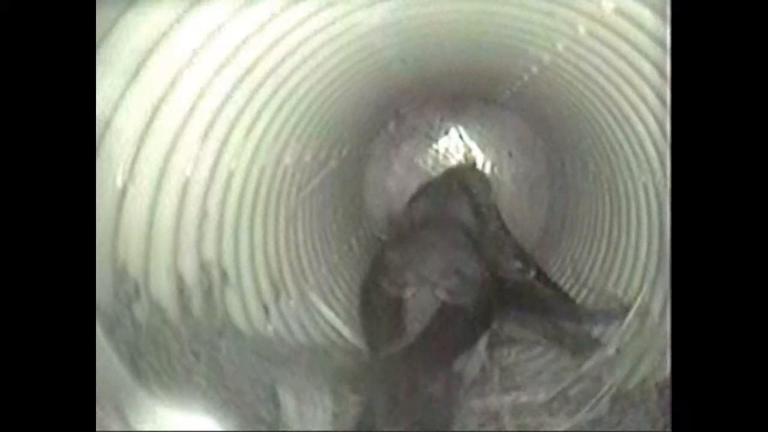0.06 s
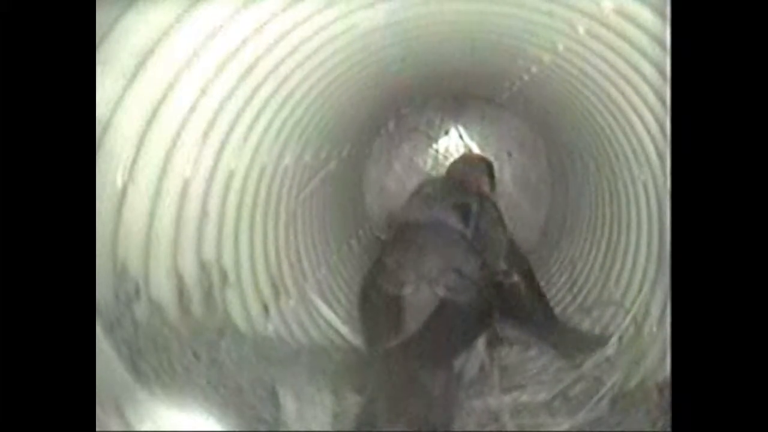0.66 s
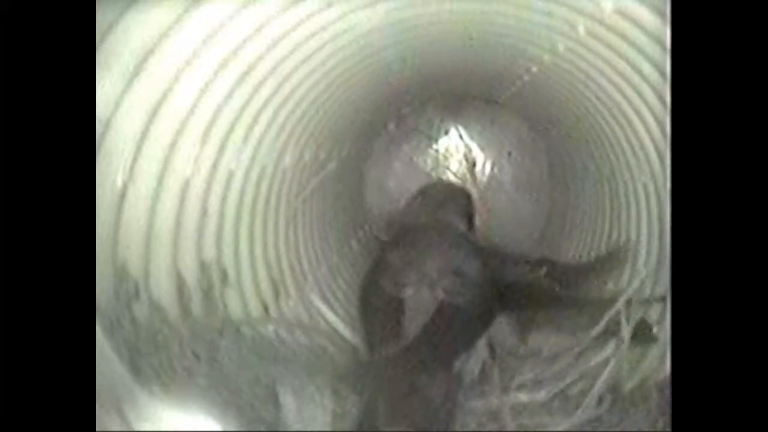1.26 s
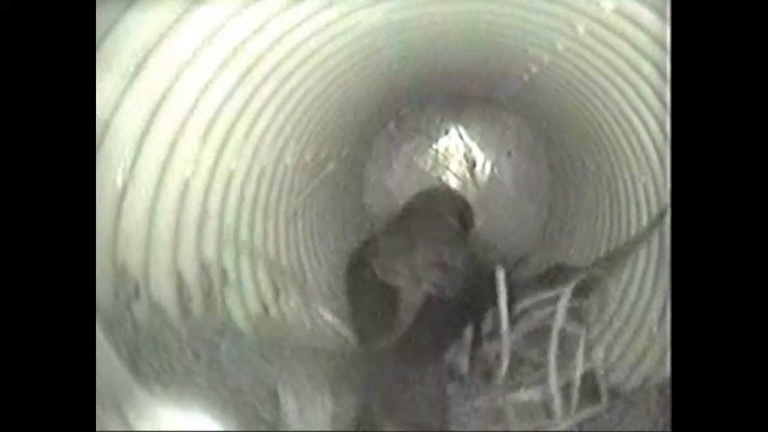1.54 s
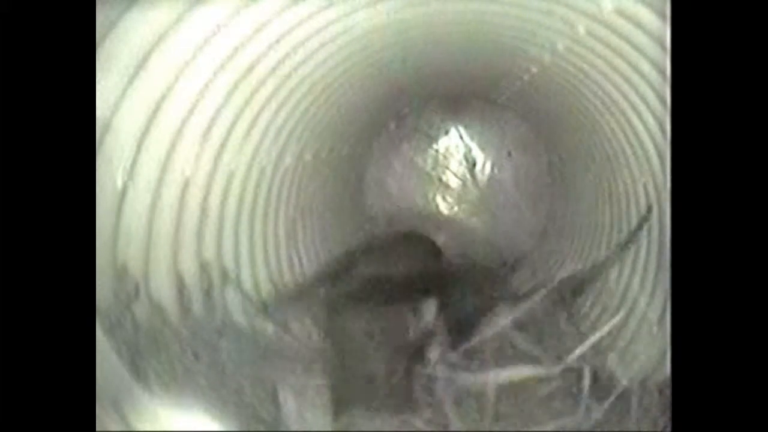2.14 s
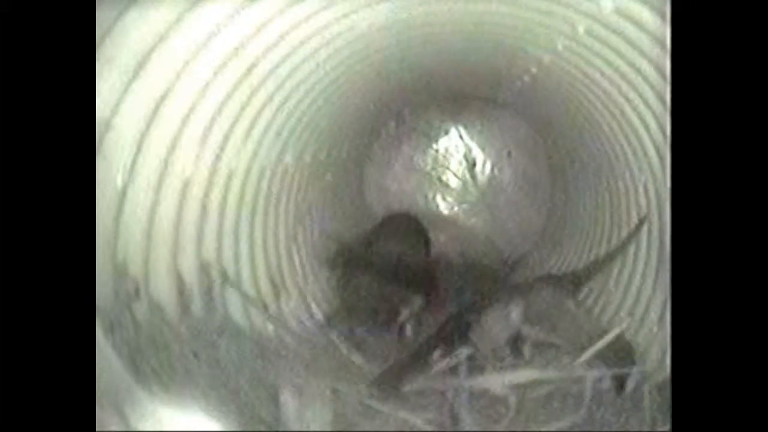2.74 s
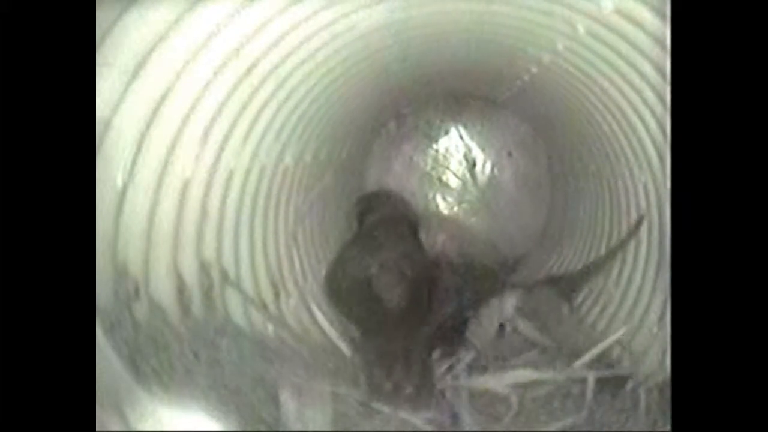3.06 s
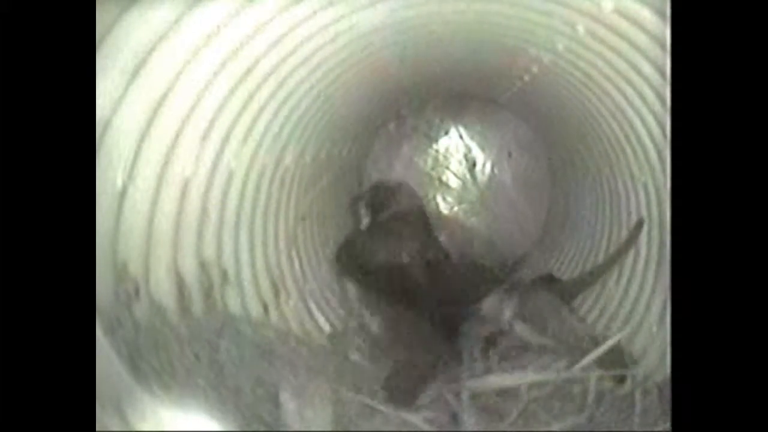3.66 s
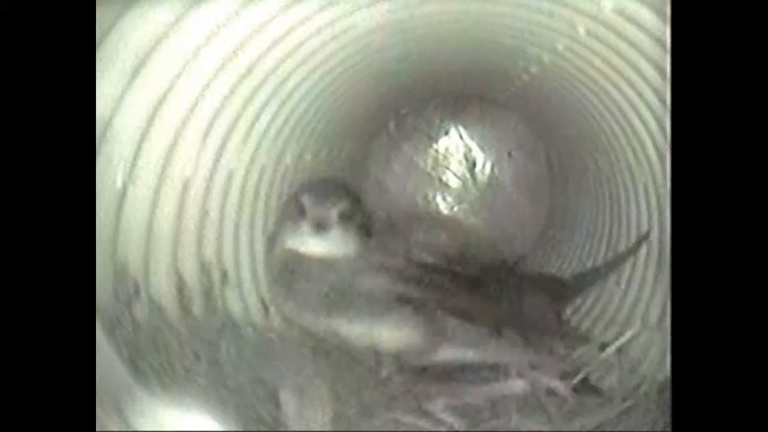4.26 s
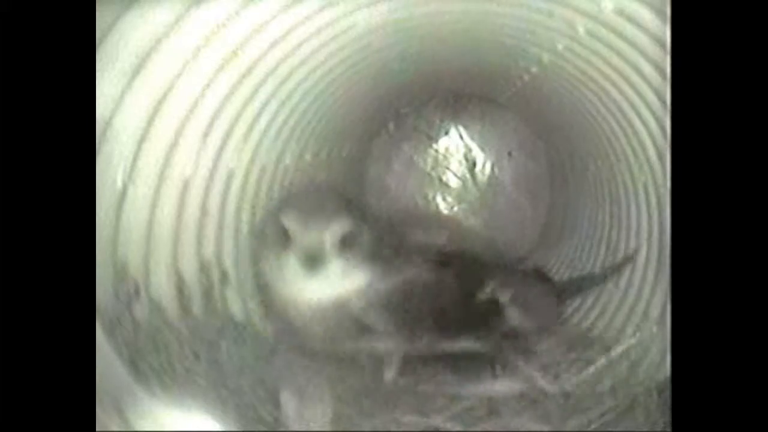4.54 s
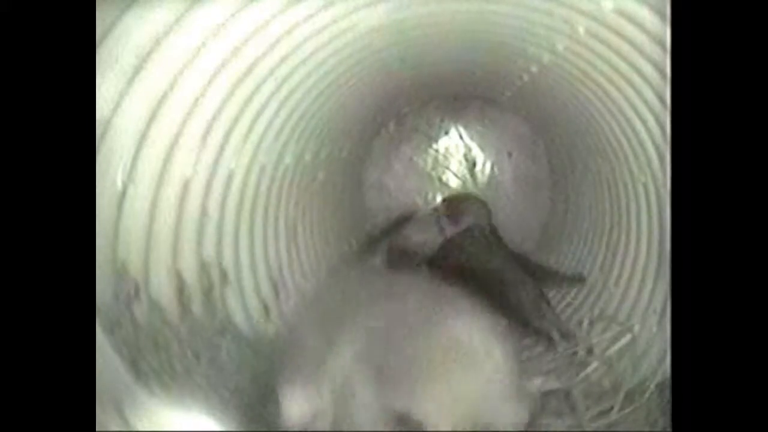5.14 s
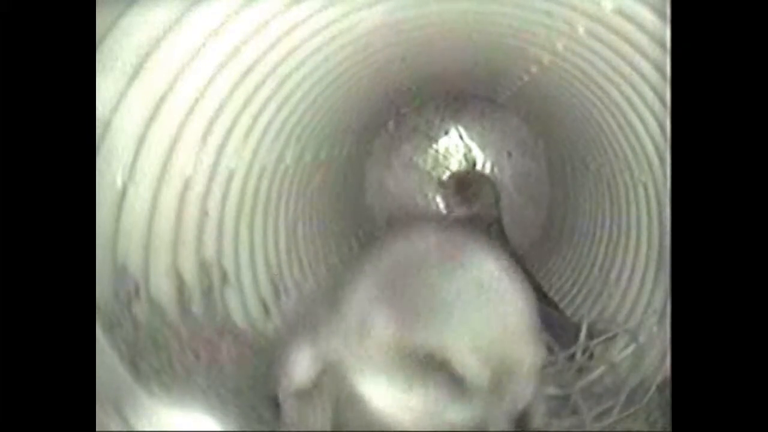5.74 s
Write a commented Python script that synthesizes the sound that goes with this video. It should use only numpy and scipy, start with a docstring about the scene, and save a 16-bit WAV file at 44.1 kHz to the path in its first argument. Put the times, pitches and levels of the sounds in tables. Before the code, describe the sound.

Heard through a small microphone inside a narrow nesting pipe, a faint steady hum, thin whine and hiss lie under brief, hoarse calls from small birds. The raspy squawks come mostly in pairs with pauses between, growing louder. Through the middle the birds shuffle, their claws lightly scratching and ticking on straw. Two dull microphone pops land on the strongest rasp, then the rustling fades around a last pair of calls.

```python
"""Inside a ribbed nest pipe, small birds shuffle on straw and give short, scratchy rasps, mostly in pairs.
Each rasp is a quick train of arched pips and two-voiced burrs from the syrinx; most swell, and all
end in a falling squawk. Claws tick on the straw, and the loudest pips overload the microphone
into two dull pops. The nest camera adds a 50 Hz electrical buzz, a thin whine and hiss."""
import sys
import numpy as np
from scipy import signal
from scipy.fft import rfft, irfft, next_fast_len
from scipy.io import wavfile
from scipy.ndimage import map_coordinates

SR = 44100
rng = np.random.default_rng(int(sys.argv[2]) if len(sys.argv) > 2 else 0)


def pcm_store(signal):
    """Save signal as 16-bit PCM."""
    levels = np.round(np.clip(np.atleast_2d(signal), -1, 1) * 32767)
    wavfile.write(sys.argv[1], SR, levels.astype(np.int16).T)


N = 255765


def amp(db):
    return 10 ** (np.asarray(db) / 20)


def unit_rms(x):
    return x / np.sqrt(np.mean(x ** 2) + 1e-20)


def gain_at(spectrum, hz):
    """Linear gain from (frequency [Hz], gain [dB]) points on a log axis."""
    knots_hz, knots_db = np.transpose(spectrum)
    return amp(np.interp(np.log(hz + 1), np.log(knots_hz + 1), knots_db))


def filtered(x, response):
    """Zero-phase filter with gain response(hz)."""
    size = next_fast_len(len(x) + SR // 10)
    return irfft(rfft(x, size) * response(np.fft.rfftfreq(size, 1 / SR)), size)[:len(x)]


def coloured(x, spectrum):
    return filtered(x, lambda hz: gain_at(spectrum, hz))


def wobble(t, knots_per_s):
    """Smooth random curve."""
    return map_coordinates(rng.standard_normal(1024), [(t - t[0]) * knots_per_s], mode="wrap")


def bell(x, width):
    return np.exp(-.5 * (x / width) ** 2)


# Buzz partials: (frequency before rounding to a harmonic [Hz], relative level [dB])
BUZZ_PARTIALS = [(150.7, -82), (199.2, -76.5), (247.6, -73.5), (301.5, -71), (349.9, -72), (398.4, -70),
                 (452.2, -73.5), (500.6, -74), (899.0, -79.5), (947.5, -79), (1001, -72.5), (1050, -84.5),
                 (1098, -81.5)]


def camera_buzz(buzz_hz=50, whine_hz=1000, tick_s=.0012):
    """Harmonics line up in one soft tick a cycle; the whine has a free phase."""
    t = np.arange(N) / SR
    buzz = np.zeros(N)
    for hz, db in BUZZ_PARTIALS:
        hz = buzz_hz * np.round(hz / buzz_hz)
        phase = rng.uniform(0, 2 * np.pi) if hz == whine_hz else rng.normal(0, .16)
        buzz += np.sqrt(2) * amp(db) * np.cos(2 * np.pi * hz * (t - tick_s) + phase)
    return amp(2) * buzz


# Hiss spectrum: (frequency [Hz], gain [dB])
HISS_SPECTRUM = [(25, -10), (60, -20), (110, -18.5), (180, -8.5), (310, -2), (420, 0), (600, -4), (800, -6),
                 (1050, -7.5), (1500, -13.5), (4000, -23.5), (9000, -31.5), (11200, -38.5), (12300, -73)]


def camera_hiss(rms_db=-59.5):
    """Steady noise floor of the nest camera."""
    return amp(rms_db) * unit_rms(coloured(rng.standard_normal(N), HISS_SPECTRUM))


# Rustle envelope: (time [s], relative level [dB])
RUSTLE_LEVELS = [(0, -87), (1.6, -80), (1.85, -64.5), (2.2, -78), (5.0, -77), (5.8, -89)]
# Claw catches: (time [s], relative level [dB])
CLAW_CATCHES = [(2.2935, -47), (2.6366, -45.5), (2.7044, -46.5), (2.8206, -49), (2.849, -41.5),
                (2.914, -51.5), (3.0123, -47.5), (3.147, -46.5), (3.273, -55), (3.512, -53), (3.536, -43.5),
                (3.658, -54), (4.173, -53), (4.2707, -50.5), (4.459, -54)]
# Straw spectrum: (frequency [Hz], gain [dB])
STRAW_SPECTRUM = [(800, -47), (1800, 4.5), (3200, 6.5), (4700, 8), (5600, -13.5), (9500, -17.5),
                  (11900, -7), (13000, -48)]


def straw(catch_s=.0017, brush_s=.013, brush_db=-16):
    """Stalks crackle under the birds; a claw's catch adds a tick and a softer, longer brush."""
    t = np.arange(N) / SR
    rustle_db = np.interp(t, *np.transpose(RUSTLE_LEVELS))
    force = amp(rustle_db + 1.02 * wobble(t, 25.4))
    for time_s, db in CLAW_CATCHES + light_steps():
        near = abs(t - time_s) < .08
        since_s = t[near] - time_s - .003
        force[near] += amp(db - 11) * (bell(since_s, catch_s) + amp(brush_db) * bell(since_s, brush_s))
    grains = rng.standard_normal(N) * amp(3.5 * wobble(t, 350))
    return amp(4.5) * coloured(force * unit_rms(grains), STRAW_SPECTRUM)


def light_steps(from_s=2.0, to_s=4.75, steps_per_s=10, count=40):
    """Uneven scratches as the birds turn round: (time [s], relative level [dB])."""
    lag, strength = rng.standard_normal((count, 2)).T
    time_s = from_s + (np.arange(count) + .5 * lag) / steps_per_s
    level_db = -53.5 + 6 * strength
    return list(np.column_stack([time_s, level_db])[time_s < to_s])


PIP_PERIOD_S = .021


def syrinx_voice(t, pitch_hz, glide, rough):
    """One side of the syrinx: a whistle with weak overtones, its glides repeating every cycle."""
    gesture = wobble(t % PIP_PERIOD_S, 560)
    hz = pitch_hz * (1 + glide * gesture + rough * wobble(t, 2000))
    phase = 2 * np.pi * np.cumsum(hz) / SR
    wave = np.sin(phase) + amp(-25) * np.sin(2 * phase) + amp(-23) * np.sin(3 * phase)
    return unit_rms(wave * amp(1.5 * wobble(t, 900)))


def pips(t, from_pip_s, low_hz, taut_hz=2656):
    """Pitch arches, loudest at the top; pitch and level follow the tension of the low voice."""
    slack_octaves = max(np.log2(taut_hz / low_hz), 0)
    top_hz = 3780 + .9 * (low_hz - taut_hz)
    arch = 1 - .63 * (1 - bell(from_pip_s, .0024))
    crest = bell(from_pip_s, .0008) + .33 * bell(from_pip_s, .0024)
    return amp(3 - 46 * slack_octaves) * crest * syrinx_voice(t, top_hz * arch, glide=.044, rough=.059)


# Hoarse air spectrum: (frequency [Hz], gain [dB])
THROAT_SPECTRUM = [(700, -15), (1400, -14), (2000, -6), (3300, -4), (5200, -5), (6500, -12), (9500, -13),
                   (11500, -11), (14000, -13)]


def burr(t, left_s, slack, low_hz, high_hz, rest_hz=1930, air_width_hz=380):
    """Both sides of the syrinx sound amid turbulent air and sag as the pressure gives out."""
    tension = (1 - .55 * slack) * (1 - .868 * bell(left_s, .0072))
    sag = 1 - .117 * bell(left_s, .00663)
    low = syrinx_voice(t, rest_hz + (low_hz - rest_hz) * tension, glide=.11, rough=.0483)
    high = syrinx_voice(t, high_hz * sag * (1 - .18 * slack), glide=.13, rough=.0463)
    bands = lambda hz: bell(hz - low_hz, air_width_hz) + bell(hz - high_hz, air_width_hz)
    air = filtered(rng.standard_normal(len(t)), lambda hz: bands(hz) + gain_at(THROAT_SPECTRUM, hz))
    return amp(-5) * low + amp(-3.5) * high + amp(-5.5) * unit_rms(air)


def rasp(t, first_pip_s, length_s, end_db, swell_db, low_hz, high_hz):
    """Pips alternate with burrs; the gaps fill in and the pulses fuse into a squawk."""
    left_s = length_s - t
    cycle = (t - first_pip_s) / PIP_PERIOD_S
    from_pip_s = (cycle - np.round(cycle)) * PIP_PERIOD_S
    from_burr_s = (cycle % 1 - .5) * PIP_PERIOD_S
    pip_train = pips(t, from_pip_s, low_hz) * (left_s > .011)

    squawk = np.clip((.022 - left_s) / .00775, 0, 1)
    slack = 1 - np.maximum(bell(from_burr_s, .0036), squawk)
    gap_fill = .33 * np.clip((t - .006) / .03, 0, 1)
    pulses = .72 * bell(from_burr_s + .0008, .0022) + .45 * bell(from_pip_s + .004, .001)
    throb = .6 + .5 * bell(left_s % .009 - .005, .0018)
    burr_envelope = np.maximum(gap_fill + (1 - gap_fill) * pulses, squawk * throb)
    burr_train = burr_envelope * burr(t, left_s, slack, low_hz, high_hz)

    effort_db = end_db - swell_db * np.clip((left_s - .015) / (length_s - .015), 0, 1)
    soft_opening_db = -3 * (t < first_pip_s + .003) * (first_pip_s < PIP_PERIOD_S / 3)
    gate = np.clip(t / .0012, 0, 1) * np.clip(left_s / .0055, 0, 1)
    return gate * amp(effort_db + soft_opening_db) * (burr_train + pip_train)


# Rasps: (start [s], first pip delay [s], length [s], relative end level [dB], swell [dB],
# low voice [Hz], high voice [Hz])
RASP_CALLS = [ (0.237, .0125, .044, -46, -0.5, 2350, 4630), (0.334, 0.0028, 0.078, -38, 3, 2810, 4750),
              (0.857, .012, 0.028, -56, -6, 1900, 3770), (1.625, 0.014, 0.085, -36, 11, 2950, 4840),
              (1.749, 0.0021, .087, -35.5, 4, 2823, 4410), (1.903, 0.0033, .087, -33.5, 8, 3193, 4700),
              (2.342, .018, 0.087, -38, 3.5, 2610, 4480), (2.490, 0.0048, .088, -36, 3, 2704, 4540),
              (3.798, 0.00154, .098, -31, 10, 2990, 4574), (3.9541, .004, 0.094, -28.5, 3, 2970, 4690),
              (4.942, 0.00097, 0.1, -31.5, 9.5, 2301, 5260), (5.14, .0105, 0.079, -37.5, -2.5, 2367, 4680)]
# Pipe and microphone response: (frequency [Hz], gain [dB])
PIPE_RESPONSE = [(100, 5.5), (600, 10), (1600, 2), (1950, 6), (2450, -4.8), (3050, 3.6), (3800, -4),
                 (4600, 3), (5300, -0.5), (6500, -1), (9800, -2.5), (11500, 6), (13000, -5), (14200, -20)]


def birds(rt60_s=.018, echo_db=-12):
    """Rasps with quick reflections from the pipe wall; harder ones are brighter."""
    out, t = np.zeros(N + SR), np.arange(SR // 7) / SR
    for start_s, first_pip_s, length_s, end_db, swell_db, low_hz, high_hz in RASP_CALLS:
        call = rasp(t, first_pip_s, length_s, end_db, swell_db, low_hz, high_hz)
        treble_db = .25 * (end_db + 41.5)
        call = filtered(call, lambda hz: amp(treble_db * np.clip((hz - 5000) / 1500, 0, 1)))
        wall = rng.standard_normal(len(t)) * amp(-60 * t / rt60_s) * (t > .0004)
        echo = signal.fftconvolve(call, wall / np.linalg.norm(wall))[:len(t)]
        out[round(start_s * SR):][:len(t)] += call + amp(echo_db) * echo
    return coloured(out[:N], PIPE_RESPONSE)


# Microphone overloads: (time [s], relative level [dB])
OVERLOADS = [(4.022, -20.5), (4.031, -26.5)]
# Pop spectrum: (frequency [Hz], gain [dB])
POP_SPECTRUM = [(60, -44), (150, -8), (230, 5), (550, -2), (900, -10.5), (1600, -4), (4000, -60)]


def overload_pops(t60_s=.0081):
    """The overloaded microphone recovers with a short, dull pop."""
    out, t = np.zeros(N), np.arange(SR // 30) / SR
    sinking_hz = 270 + 500 * np.exp(-t / .0016)
    tone = np.sin(2 * np.pi * np.cumsum(sinking_hz) / SR)
    for time_s, db in OVERLOADS:
        out[round(time_s * SR):][:len(t)] += amp(db - 60 * t / t60_s) * tone
    return coloured(out, POP_SPECTRUM)


def scene():
    """One microphone in the pipe feeds both channels."""
    mono = birds() + overload_pops() + straw() + camera_buzz() + camera_hiss()
    return np.array([mono, mono])


def record(dry, asymmetry=.17, leak_hz=110, top_hz=14100):
    """The lopsided microphone turns loud rasps into faint bass flutter; the camera cuts the top."""
    bass_band = lambda hz: hz / (hz + 40) / (1 + (hz / leak_hz) ** 2)
    distorted = [x + asymmetry * filtered(x ** 2, bass_band) for x in dry]
    return np.array([filtered(x, lambda hz: hz < top_hz) for x in distorted])


dry = scene()
out = record(dry)
pcm_store(out)
```